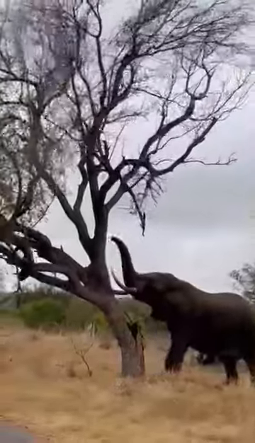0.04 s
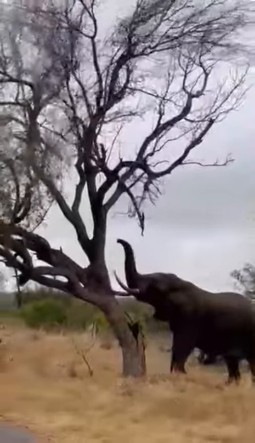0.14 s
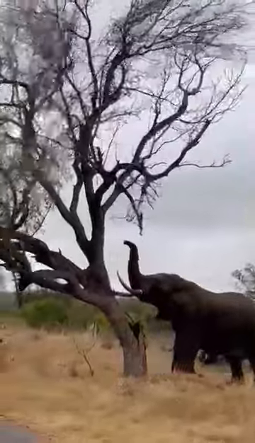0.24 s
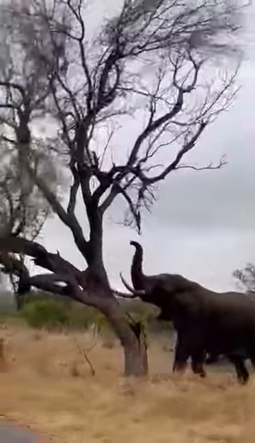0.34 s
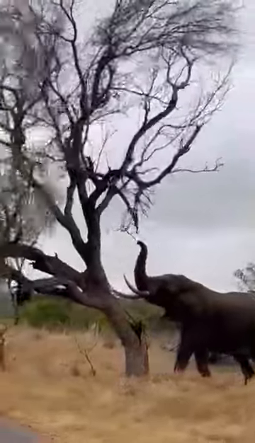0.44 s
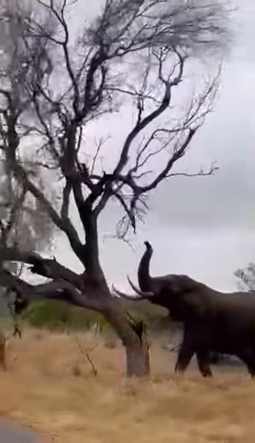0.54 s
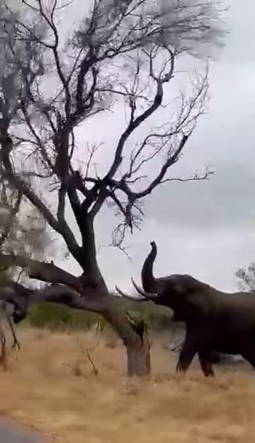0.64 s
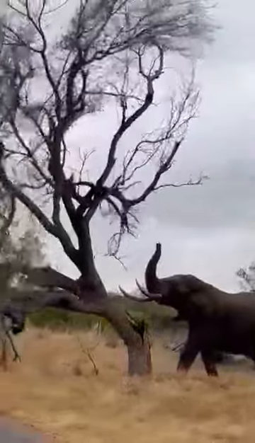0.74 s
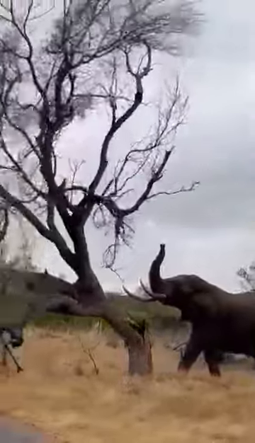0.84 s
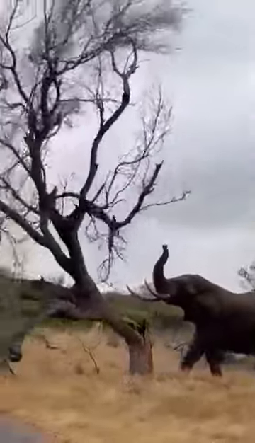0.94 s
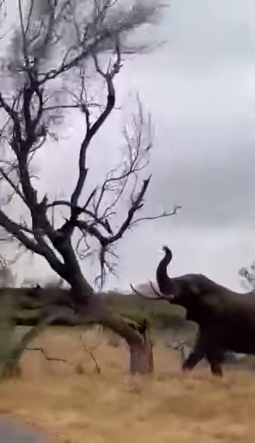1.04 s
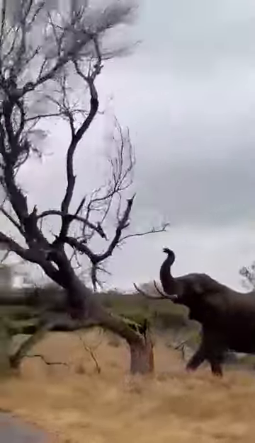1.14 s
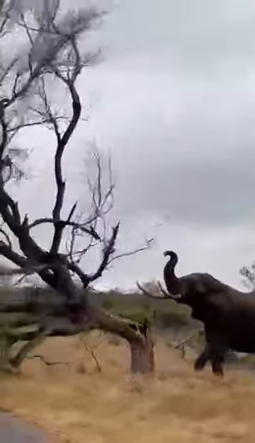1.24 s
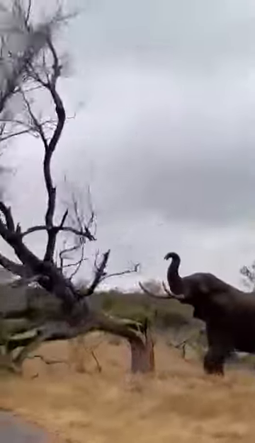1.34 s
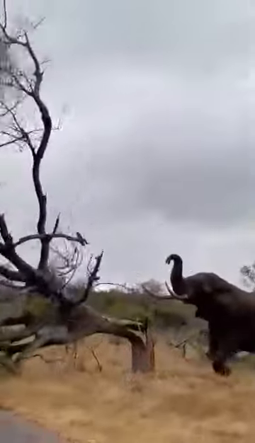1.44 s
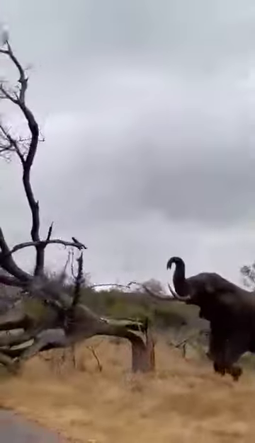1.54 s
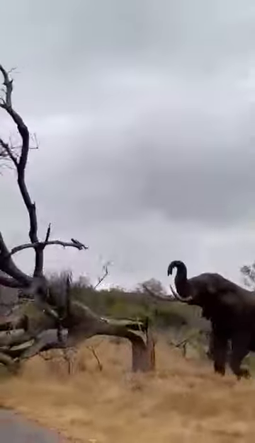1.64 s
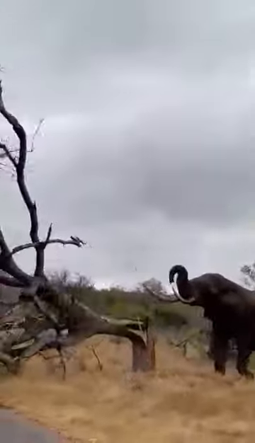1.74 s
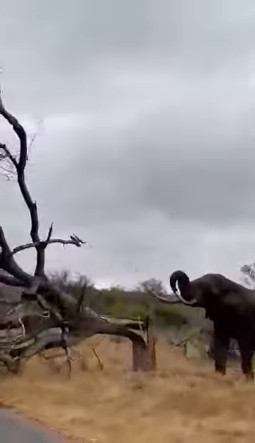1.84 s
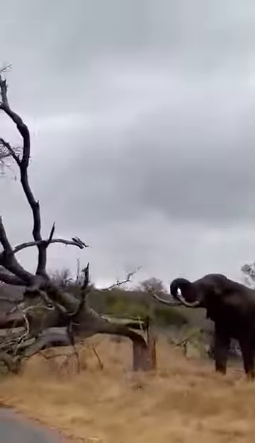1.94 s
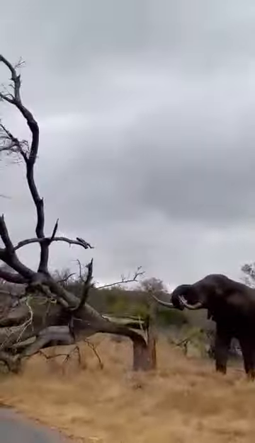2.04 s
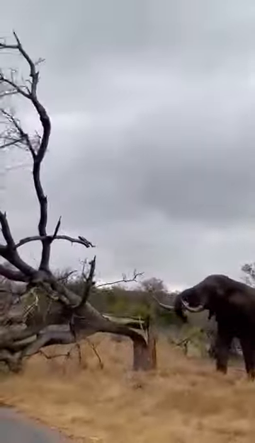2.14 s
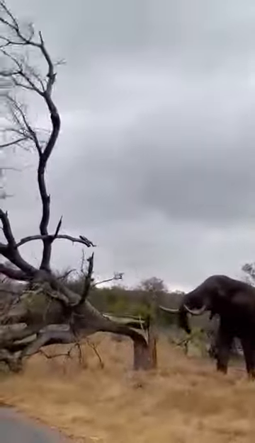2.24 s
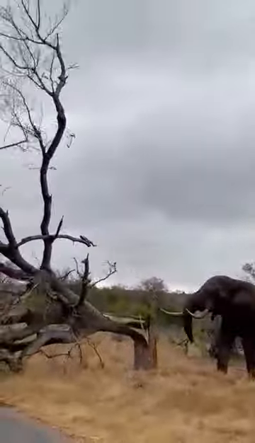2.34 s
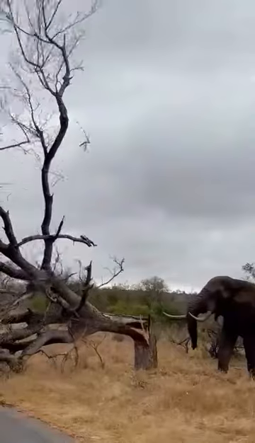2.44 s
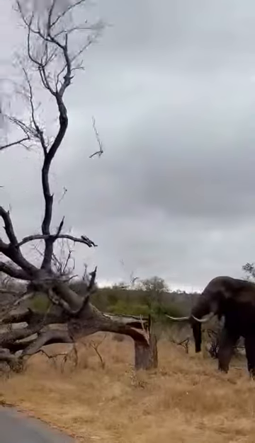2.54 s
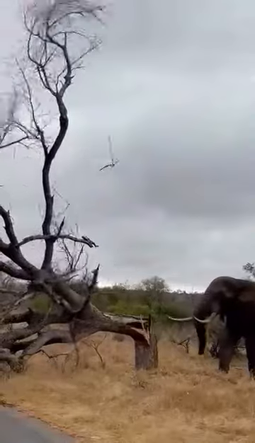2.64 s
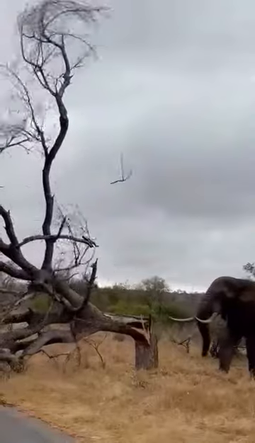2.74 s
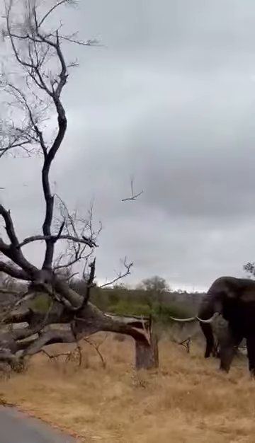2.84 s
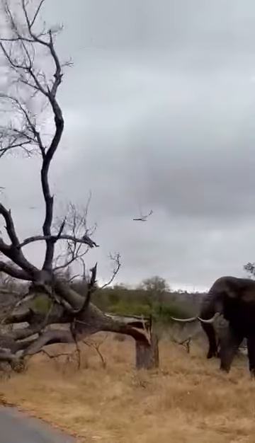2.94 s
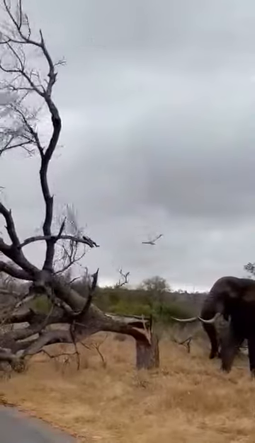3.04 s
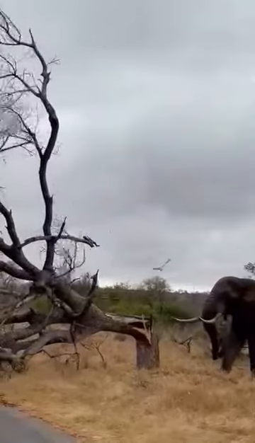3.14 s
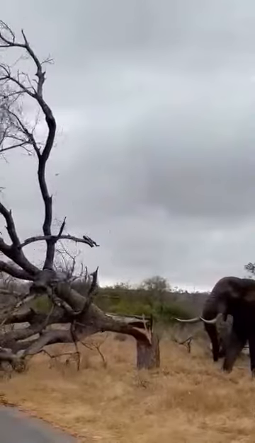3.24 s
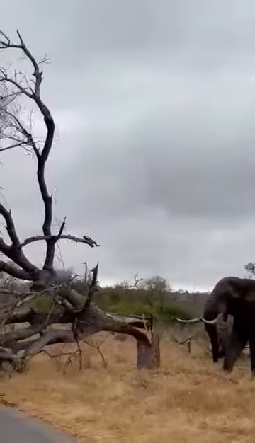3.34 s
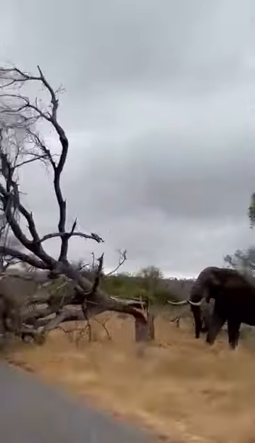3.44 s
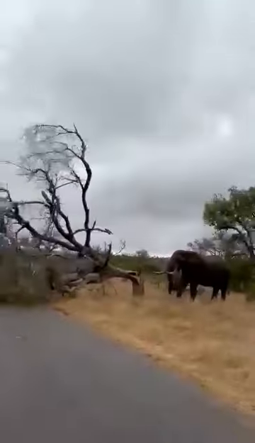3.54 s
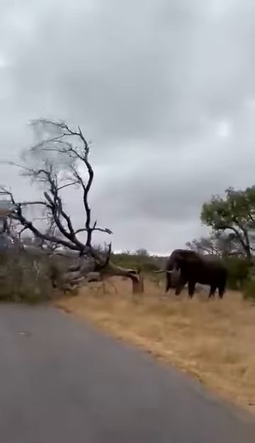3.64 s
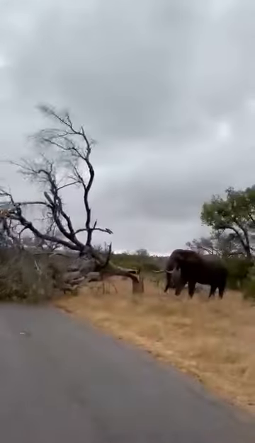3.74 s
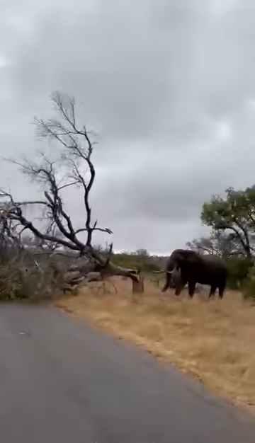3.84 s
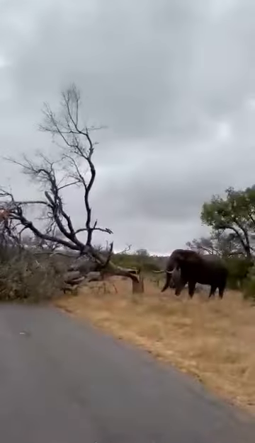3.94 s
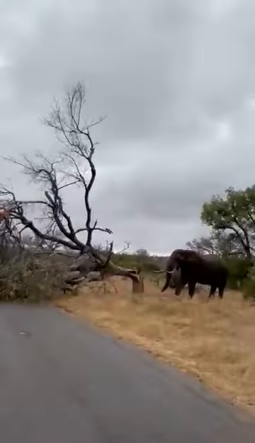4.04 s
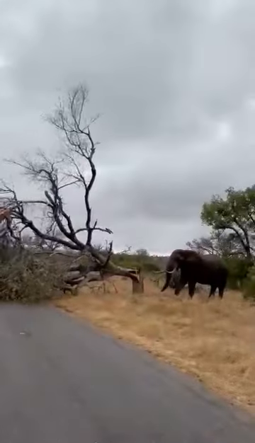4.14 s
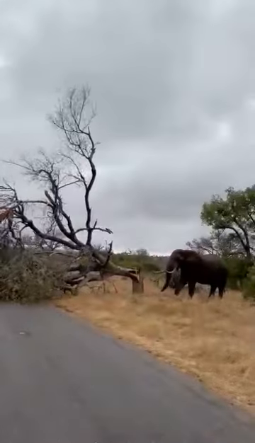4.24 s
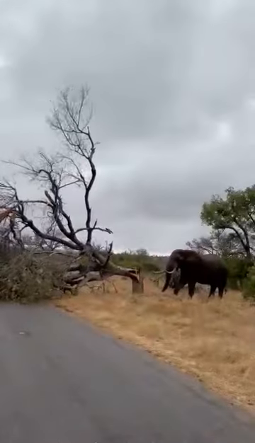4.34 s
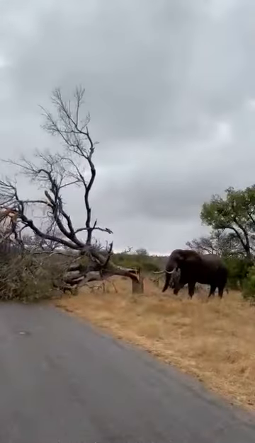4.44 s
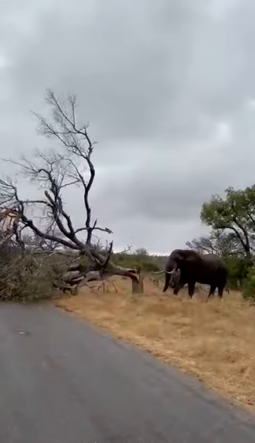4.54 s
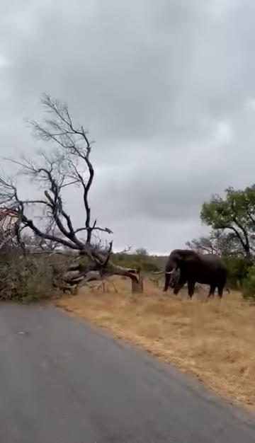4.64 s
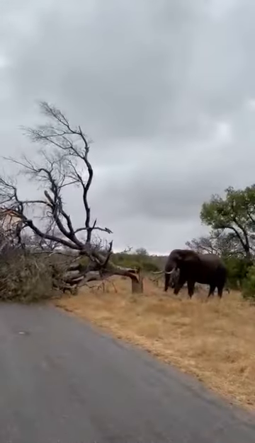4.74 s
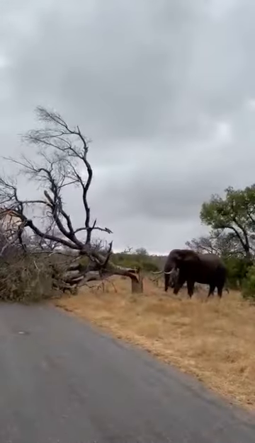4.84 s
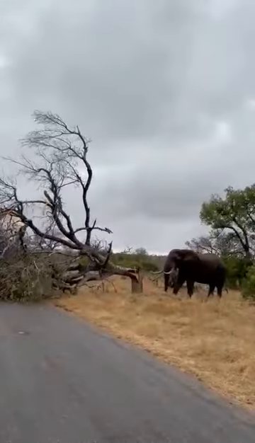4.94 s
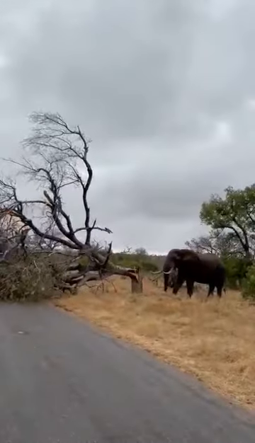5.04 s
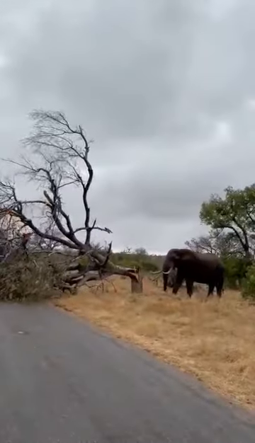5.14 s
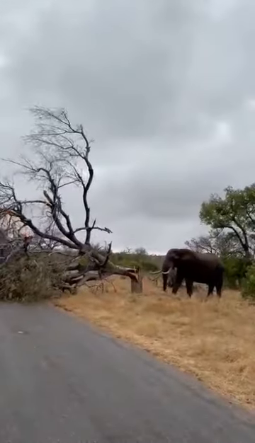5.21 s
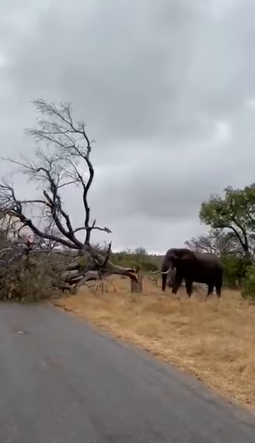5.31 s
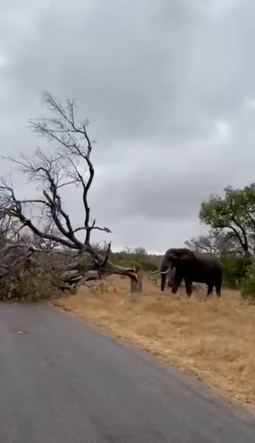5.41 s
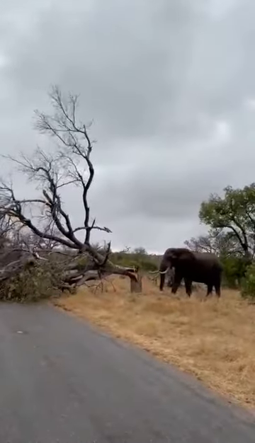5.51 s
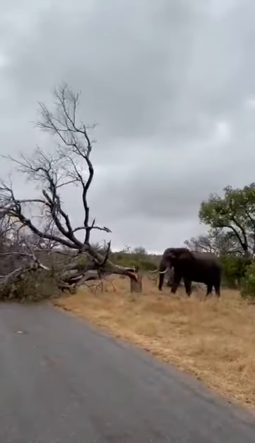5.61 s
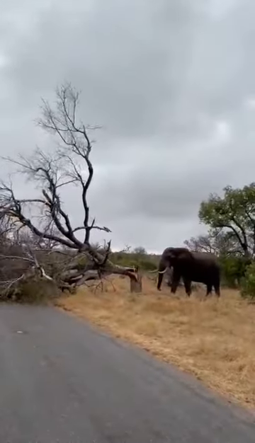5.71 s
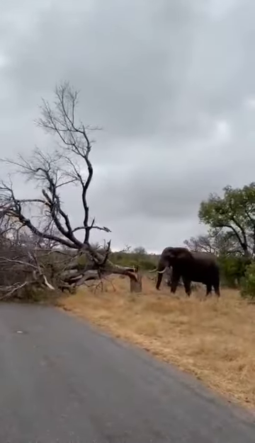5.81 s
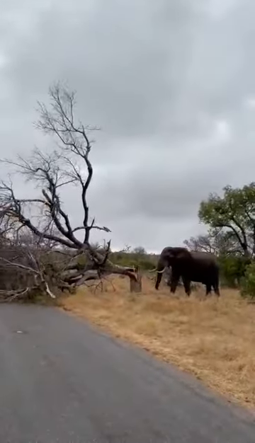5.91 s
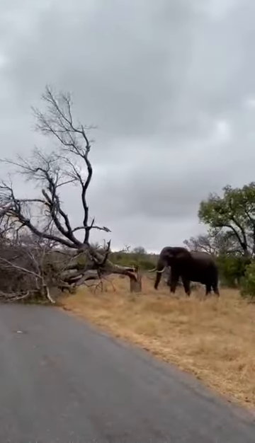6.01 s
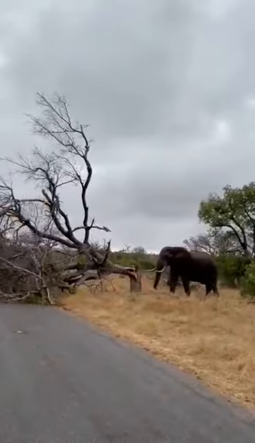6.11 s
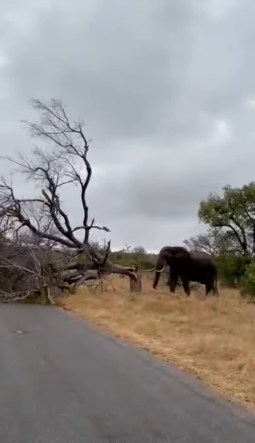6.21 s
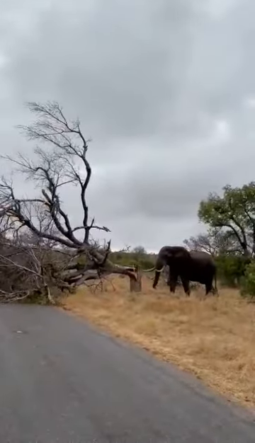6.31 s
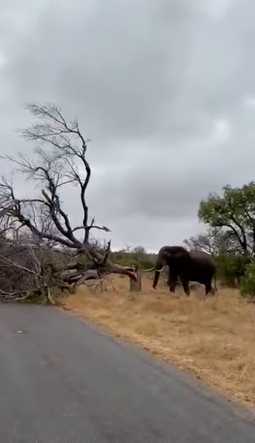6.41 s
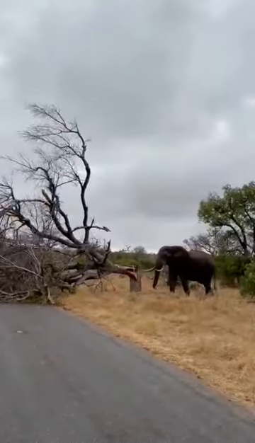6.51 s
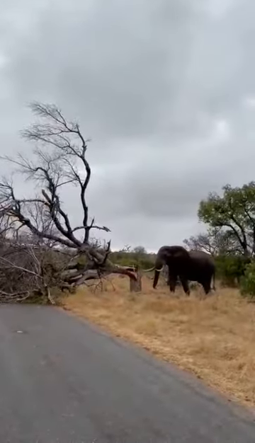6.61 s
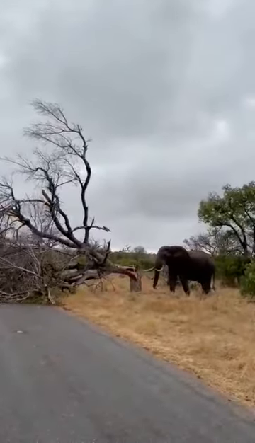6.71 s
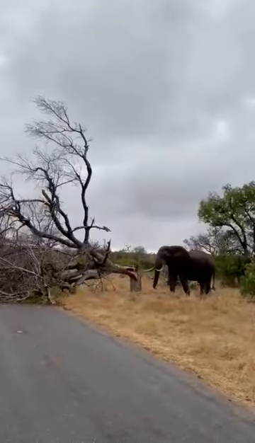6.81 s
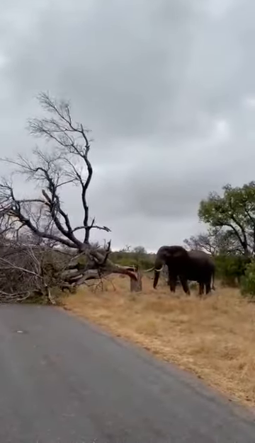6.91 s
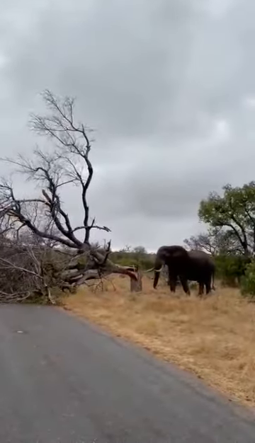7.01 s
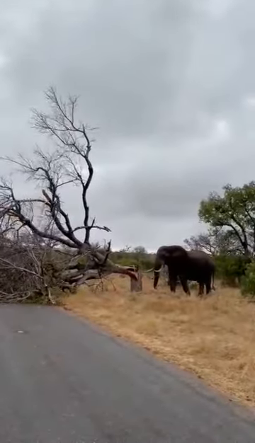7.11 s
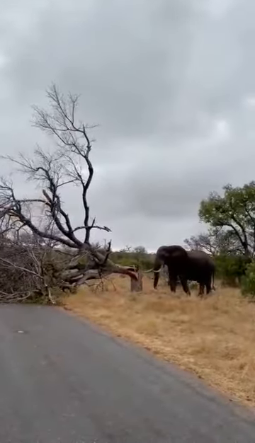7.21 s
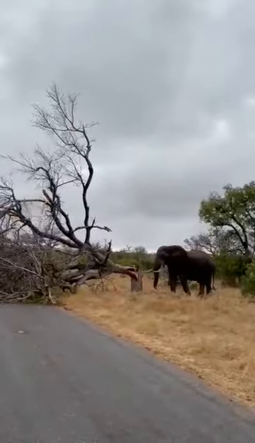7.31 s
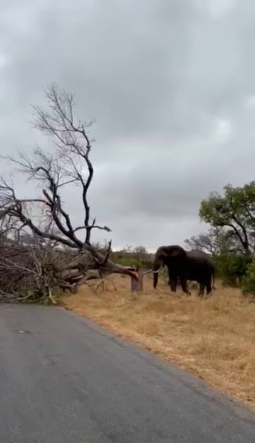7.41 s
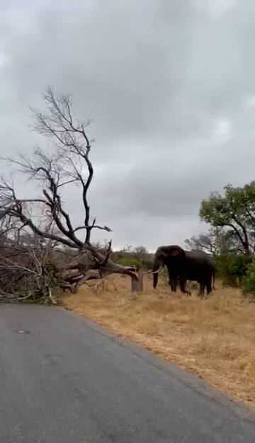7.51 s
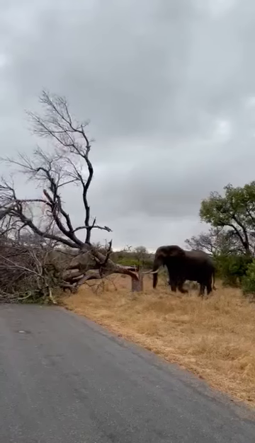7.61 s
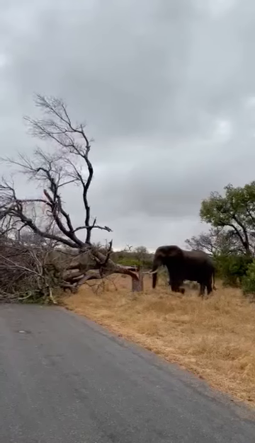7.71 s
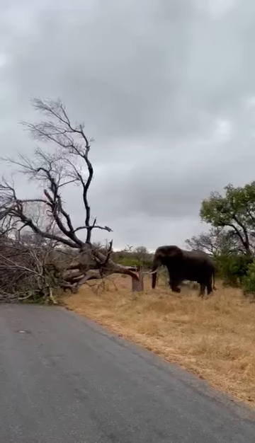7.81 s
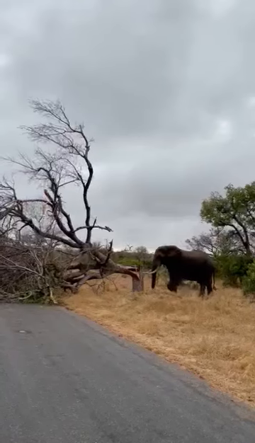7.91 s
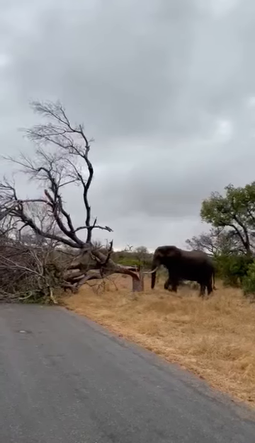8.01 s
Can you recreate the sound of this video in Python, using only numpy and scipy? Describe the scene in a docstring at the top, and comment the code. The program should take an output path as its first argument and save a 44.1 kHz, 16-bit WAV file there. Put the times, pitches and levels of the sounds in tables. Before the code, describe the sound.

Outdoors in open bush, a large dead trunk gives way at once in a dense run of loud, dry cracks. Thick limbs break with thuds sweeping down in pitch, then the crown crashes in crunching crackle and twig hiss. After about three seconds only scattered snaps, soft swishes and ticks remain, fading into a low rumble of air. A slightly overloaded handheld microphone catches a very short, dry echo.

```python
"""A big dead trunk splinters in sharp cracks as the tree is pushed over beside a road in open bush.
Bursts of parting fibres make the cracks; thick limbs break with a thud that sweeps down in pitch.
The crown crashes down in filtered crackle and hiss, then its twigs swish and tick as it settles.
A short outdoor echo, a low rumble of open air and one bump of wind on the microphone surround it."""
import sys
import numpy as np
from scipy import signal
from scipy.fft import rfft, irfft, next_fast_len
from scipy.io import wavfile

SR = 44100
rng = np.random.default_rng(int(sys.argv[2]) if len(sys.argv) > 2 else 0)


def generate_wav(signal):
    """Clip the signal to [-1, 1] and save it as 16-bit WAV at the path in sys.argv[1]."""
    frames = np.transpose(np.atleast_2d(signal))
    scaled = np.clip(frames, -1, 1) * 32767
    pcm = np.round(scaled).astype(np.int16)
    wavfile.write(sys.argv[1], SR, pcm)


N = 355446
TIME = np.arange(N) / SR

# the trunk splits in jerks: (time [s], level [dB])
TRUNK_SPLITS = [(0.006, -10), (0.01, -16), (0.047, -7.5), (0.060, -2), (0.073, -14), (0.081, -18.5),
                (0.137, -18), (0.174, -21.5), (0.253, -14), (0.276, -8.5), (0.292, -17), (0.337, -11),
                (0.344, -17), (0.393, -17.5), (0.405, -12), (0.429, -24.5), (0.471, -19.5), (0.499, -25),
                (0.531, -12.5), (0.551, -12), (0.557, -13), (0.601, -14), (0.622, -14.5), (0.649, -18.5),
                (0.669, -13.5), (0.678, -9.5), (0.706, -15.5), (0.743, -10), (0.782, -8.5), (0.807, -18.5),
                (0.831, -8.5), (0.86, -15.5), (0.874, -15.5), (0.892, -13.5), (0.904, -11.5), (0.914, -13)]
# thick limbs break with a thud:
# (time [s], crack level [dB], crack pitch [Hz], tearing [ms], thud level [dB], thud pitch [Hz])
LIMB_BREAKS = [(0.757, -5, 2030, 3.4, -5.5, 263), (0.924, -0.5, 580, 2.5, -2.5, 172),
               (1.214, -9.5, 1820, 6.1, -21, 74), (1.311, -3.5, 1220, 1.3, -3.5, 340),
               (1.352, -18.5, 879, 50, -19, 420), (1.455, -6, 1700, 5.3, -8, 235),
               (1.600, -4, 1100, 0.93, -6.5, 620), (1.913, -6, 950, 4.6, -5.5, 1170),
               (2.108, -11.5, 1760, 7.5, -23.5, 128), (2.268, -8.5, 1100, 3.5, -27, 171),
               (5.577, -9, 3750, 0.93, -38, 430), (7.84, -47, 1000, 3.5, -34.5, 185)]


def amp(db):
    """Decibels to gain."""
    return 10 ** (np.asarray(db) / 20)


def unit(x):
    """Scale to rms 1."""
    return x / np.sqrt(np.mean(x ** 2))


def band(x, lo_hz, hi_hz, order=2):
    """Causal band-pass."""
    edges = [lo_hz, min(hi_hz, .45 * SR)]
    return signal.sosfilt(signal.butter(order, edges, "band", fs=SR, output="sos"), x)


def across(points, size):
    """Read (Hz, value) points at the bins of a transform, on a log-frequency axis."""
    hz, value = np.transpose(points)
    return np.interp(np.log(np.fft.rfftfreq(size, 1 / SR) + 1), np.log(hz), value)


def colour(x, points):
    """Filter x by a gain curve of (Hz, dB) points."""
    size = next_fast_len(N + 4096)
    return irfft(rfft(x, size) * amp(across(points, size)), size)[..., :N]


def walk(rate):
    """Slow chance with a spread near 1: random values, rate of them a second, joined by lines."""
    knots = rng.standard_normal(2048)
    return np.interp(TIME * rate, np.arange(len(knots)), knots)


def add(track, start_s, sound):
    """Mix a sound into a track."""
    i = max(int(start_s * SR), 0)
    track[i:i + len(sound)] += sound[:N - i]


def fractures():
    """Every crack of trunk, limb and branch as (s, dB, pitch Hz, tearing ms)."""
    # branches snap under the weight of the crown:
    # (time [s], level [dB], pitch [Hz], tearing [ms])
    snaps = [(1.039, -16, 1900, 3), (1.073, -6.5, 3970, 0.53), (1.117, -4.5, 1230, 1.2),
             (1.262, -12, 3580, 2.3), (1.440, -5.5, 1580, 5.7), (1.469, -7.5, 1695, 0.84),
             (1.547, -11.5, 2140, 3.1), (1.567, -6.5, 804, 6), (1.901, -8.5, 2410, 2),
             (1.925, -9.5, 3500, 5.7), (1.936, -6.5, 3760, 2), (2.015, -19, 3480, 10.6),
             (2.258, -13.5, 2510, 3.1), (2.349, -17, 3480, 4.3), (2.447, -20.5, 5440, 7.3),
             (3.277, -27, 2020, 1.8), (3.390, -22.5, 5550, 2), (3.552, -20, 1790, 2),
             (3.615, -21, 1580, 8.8), (3.692, -26.5, 2240, 19), (3.776, -26, 2010, 6),
             (3.813, -21, 2200, 2.6), (3.831, -37, 4000, 1.3), (3.879, -29, 1360, 2.8),
             (3.980, -21, 1710, 10.6), (4.042, -29, 4260, 6.2), (4.516, -21.5, 2980, 4.1),
             (4.582, -29, 3560, 2.7), (4.768, -35.5, 1500, 3.5), (4.790, -35, 5000, 9),
             (5.154, -33.5, 2420, 4), (5.228, -34, 5520, 4.3), (5.261, -30.5, 4360, 27),
             (5.379, -31, 5440, 5), (5.877, -27, 4740, 4.7), (6.123, -19, 2110, 4.1),
             (6.140, -19.5, 4070, 1.7), (6.156, -22.5, 4870, 3), (6.744, -26, 3640, 1.4),
             (6.927, -43.5, 1790, 4), (7.465, -49.5, 1710, 1.9), (7.530, -47, 694, 4.4)]
    split_hz, split_octaves = 2040, .5  # middle pitch of a split, and the full range around it
    shortest_tear_ms, tear_doubling_db = 1.7, 9.5
    pitches = split_hz * 2 ** (split_octaves * (rng.random(len(TRUNK_SPLITS)) - .5))
    trunk = []
    for (start, db), hz in zip(TRUNK_SPLITS, pitches):
        # below -10.5 dB the softer splits tear for longer
        tear_ms = shortest_tear_ms * 2 ** (-min(db + 10.5, 0) / tear_doubling_db)
        trunk.append((start, db, hz, tear_ms))
    return trunk + [row[:4] for row in LIMB_BREAKS] + list(snaps)


def narrowness(start_s, trunk_db=4.5, limb_db=3.0, twig_db=1.26):
    """The trunk breaks first and has a clear pitch; thinner wood snaps over an ever wider range."""
    return np.interp(start_s, [.7, 1.1, 3.5], [trunk_db, limb_db, twig_db])


def branch(pitch_hz, narrow_db, above_db=4.0, low_side=0.21, lowest=0.29, ripple_db=3.3,
           travel_ms=1.494, size=512, count=24):
    """One click through a dry branch: strongest near its pitch, weak far below, with uneven modes."""
    hz = np.fft.rfftfreq(size, 1 / SR) + 1
    octaves = np.log2(hz / pitch_hz)
    db = -above_db * np.maximum(octaves, 0)
    db -= narrow_db * octaves ** 2 * np.where(octaves < 0, low_side, 1)
    db -= 10 * np.log10(1 + (lowest * pitch_hz / hz) ** 4)
    modes_db = np.interp(hz, np.geomspace(300, 12000, count), ripple_db * rng.standard_normal(count))
    # bending waves: low notes leave the wood later than high ones; travel_ms is the delay at 2 kHz
    turns = 2 * travel_ms / 1000 * np.sqrt(2000 * hz)
    return irfft(amp(db + modes_db) * np.exp(-2j * np.pi * turns), size)


def cracks(fibres_per_s=2400, first_break=0.37, gain_db=-3.5, build_ms=1.0, shreds_db=-23,
           shreds_ms=26, size=4096, count=132, channels=4):
    """Fibres start to give, the wood breaks and tearing dies away; each strand rings differently."""
    out, t = np.zeros(N), np.arange(size) / SR
    since_ms = 1000 * (t - t[count])  # the main break comes count samples in
    for start, db, pitch_hz, tear_ms in fractures():
        strain = np.exp(np.minimum(since_ms / build_ms, -since_ms / tear_ms))
        # the last shreds hold on and part after the break
        strain += amp(shreds_db) * np.exp(-since_ms / shreds_ms) * (since_ms > 0)
        strands = rng.standard_normal((channels, size))
        strands *= rng.random((channels, size)) < fibres_per_s / channels / SR
        strands *= strain
        strands[0, count] += 2 * first_break
        snap = np.zeros(size)
        for fibres in strands:
            snap += signal.fftconvolve(fibres, branch(pitch_hz, narrowness(start)))[:size]
        # a longer tear carries more energy at the same level
        length_s = (tear_ms + 1) / 2000
        add(out, start - t[count], amp(db + gain_db) * unit(snap) * np.sqrt(length_s * SR / size))
    return out


def blows():
    """Every thud as (s, dB, pitch Hz): the trunk thumps harder as it comes loose, limbs vary in note."""
    trunk_hz, thump_db = 203, -11  # every split also thumps the trunk, at this level against the split
    held_db, loose_s = -9, 0.28  # weaker while the trunk still holds, until it comes loose
    trunk = []
    for start, db in TRUNK_SPLITS:
        hold_db = np.interp(start, [0, loose_s], [held_db, 0])
        trunk.append((start, db + thump_db + hold_db, trunk_hz))
    return trunk + [(start, db, hz) for start, *_, db, hz in LIMB_BREAKS]


def thuds(turns=1.2, ground=.25, delay_turns=1.29, width=0.78, lowest=0.4, size=4096):
    """High bending waves run faster, so a thud sweeps quickly down towards its ground note."""
    out, t = np.zeros(N), np.arange(1, size + 1) / SR
    for start, db, pitch_hz in blows():
        lateness = np.log(t * pitch_hz / delay_turns)
        # forks and bends disturb the sweep a little, and side branches rattle along with it
        bends = .45 * unit(band(rng.standard_normal(size), pitch_hz / 10, pitch_hz / 2))
        rattle = .17 * unit(band(rng.standard_normal(size), pitch_hz / 2, pitch_hz * 3))
        cycles = turns * lateness + ground * pitch_hz * t + rng.random()
        sweep = np.sin(2 * np.pi * cycles + bends)
        swell = np.exp(-.5 * (lateness / width) ** 2)
        add(out, start, amp(db) * band(swell * (sweep + rattle), lowest * pitch_hz, 5500))
    return out


def squawk(peak_s=1.922, half_s=.021, level_db=-21, width_hz=150, slips_per_s=700):
    """A wrenched limb squawks: wood sticks and slips on wood in an uneven run that rings it."""
    # resonances of the twisting limb: (frequency [Hz], level [dB])
    squawk_modes = [(1100, 2.5), (3162, -11.5), (4975, -9)]
    slips = rng.standard_normal(N) * (rng.random(N) < slips_per_s / SR)
    rub = slips * np.exp(-.5 * ((TIME - peak_s) / half_s) ** 2)
    ring = np.zeros(N)
    for hz, db in squawk_modes:
        ring += amp(db) * unit(band(rub, hz - width_hz / 2, hz + width_hz / 2, order=1))
    return ring * amp(level_db) * np.sqrt(2 * half_s * SR / N)


def motion(t):
    """Levels in dB of boughs, sticks and twigs: each heave builds, lets go and leaves a trickle."""
    # the crown tips, sweeps down, lands, rolls over and rocks to rest:
    # (height of the heave [s], level [dB], build-up [dB/s], release [dB/s], weight on the boughs [dB])
    heaves = [(0.76, -38.5, 21, 45.5, 6.5), (1.27, -28, 26.5, 39, -0.5), (1.5, -23.5, 70, 90, 1.5),
              (1.91, -31, 109.5, 196, -2), (2.181, -33.5, 18.5, 28.5, -7), (3.72, -49, 25, 20, -12.5),
              (5.97, -49, 17.5, 22.5, -6.5), (6.6, -59.5, 31, 55, -7), (7.4, -69, 31.5, 27, 2)]
    trickle_db, bough_trickle_db = -17.5, -5  # loose bits fall after each heave; few of them are heavy
    wood_fade, twig_fade = 7, 8  # how fast the trickle dies away (dB/s)
    twig_smother = 0.14  # dB of twig hiss lost for each dB of weight on the boughs
    boughs = sticks = twigs = 0
    for peak_s, db, build, release, weight_db in heaves:
        before, after = np.maximum(peak_s - t, 0), np.maximum(t - peak_s, 0)
        swell = amp(db - build * before)
        heave = swell * amp(-release * after)
        debris = swell * amp(trickle_db - wood_fade * after)
        chaff = swell * amp(trickle_db - twig_fade * after)
        boughs = boughs + (heave * amp(weight_db)) ** 2 + (debris * amp(bough_trickle_db)) ** 2
        sticks = sticks + heave ** 2 + debris ** 2
        twigs = twigs + (heave * amp(-twig_smother * weight_db)) ** 2 + chaff ** 2
    return 10 * np.log10([boughs, sticks, twigs])


def splinters(stick_hz=2500, bough_hz=700, first_db=1, breaking_db=-8, settled_db=-13, spread_db=4.0,
              busy=.6, narrow_db=1.0, tear_s=0.00083, count=420):
    """Wood snaps at random, more often the more the crown moves; hard in the fall, softly once it lies."""
    out = np.zeros(N)
    s = TIME[::441]
    boughs_db, sticks_db, _ = motion(s)
    broken = np.cumsum(amp(busy * sticks_db))
    strain = np.exp(-TIME[:256] / tear_s)
    for when, strength, thinness in rng.random((count, 3)):
        start = np.interp(when, broken / broken[-1], s)
        size_db = -spread_db * np.log(max(strength, .1))
        db = np.interp(start, s, sticks_db)
        db += np.interp(start, [0, .7, 3], [first_db, breaking_db, settled_db])
        # the harder the boughs are crushed, the thicker the wood that gives
        crush_db = np.interp(start, s, boughs_db)
        pitch_hz = np.interp(crush_db, [-36, -28], [stick_hz, bough_hz]) * 2 ** (thinness - .5)
        fibres = strain * rng.standard_normal(len(strain)) ** 3  # cubing makes a few fibres stand out
        snap = unit(np.convolve(fibres, branch(pitch_hz, narrow_db)))
        add(out, start, snap * amp(db + size_db))
    return out


def crackle(grains_per_s=520, spread_db=3.2, count=13):
    """Countless small snaps and scrapes in pitch bands, of varied size and place; flat on average."""
    out = np.zeros((2, N))
    for hz in np.geomspace(70, 11000, count):
        chance = rng.random((8192, 4)).T
        when, strength, place, sign = chance[:, :int(grains_per_s * N / SR)]
        sizes = amp(-spread_db * np.log(strength.clip(.012))) * np.sign(sign - .5)
        pan = (place - .5) * min(hz / 1200, 1.5)  # high grains spread wider
        clicks = np.zeros((2, N))
        clicks[:, (when * N).astype(int)] = sizes * np.array([1 + pan, 1 - pan])
        out += unit(band(clicks, hz / 1.41, hz * 2.02, order=2)) * np.sqrt(hz)
    return out


def crown(swish_db=-5, surge_db=1.0, hiss_db=-7):
    """Boughs rumble, sticks crackle and twigs swish, surging less once the crown lies."""
    # tone of the moving crown before its zones are levelled: (frequency [Hz], level [dB])
    crown_colour = [(50, -13.5), (120, -6.5), (350, -9), (800, -2.5), (1300, -2), (3000, -9.5), (6000, -18),
                    (9000, -31), (12000, -24)]
    # the high swish comes from twigs spread wide to both sides
    sides = band(rng.standard_normal((2, N)), 2200, 9900, order=1)
    swish = unit(rng.standard_normal(N) + 0.084 * sides)
    texture = colour(unit(crackle()) + amp(swish_db) * swish, crown_colour)
    zones = [(50, 452), (443, 3380), (2800, SR)]  # boughs, sticks, twigs (Hz)
    gains = amp(motion(TIME))
    out = np.zeros((2, N))
    for (lo, hi), gain in zip(zones, gains):
        out += unit(band(texture, lo, hi, order=3)) * gain
    # after the fall a faint, narrow hiss near 9 kHz follows the twigs
    lying = np.interp(TIME, [1.8, 3.2], [0, 1])
    out += unit(band(swish, 8700, 9000)) * gains[-1] * lying * amp(hiss_db)
    return out * amp(surge_db * (2.0 - lying) * walk(45))


def twig_ticks(pitch_hz=2050, octaves=1.2, follow=0.73, ticks_db=-13, count=440, size=1024):
    """Thin twigs flick past each other: short, dry, pitched ticks that follow the crown's rocking."""
    out, t = np.zeros(N), np.arange(size) / SR
    cycles, spread_db = 3.2, 3.8  # a tick dies away over a few cycles
    for when, strength, thinness in rng.random((count, 3)):
        start = np.interp(when, [0, .3, 1], [2.4, 5.7, 7.6])  # most come late
        hz = pitch_hz * 2 ** (octaves * (thinness - .5))
        db = follow * motion(start)[1] + ticks_db - spread_db * np.log(max(strength, .03))
        add(out, start, amp(db) * np.sin(2 * np.pi * hz * t) * np.exp(-hz * t / cycles))
    return out


def bush(x, near_db=-10.5, near_t60=0.085, far_db=-23, far_t60=0.21, apart=0.19, size=44100):
    """Outdoor echo: quick scatter from ground and crown, then a faint tail from the bushes around."""
    t = np.arange(size) / SR
    noise = rng.standard_normal(size) + apart * rng.standard_normal((2, size))
    near = band(noise, 250, 17000, order=1) * amp(-60 * t / near_t60) * (t > .002)
    far = band(noise, 170, 6700, order=1) * amp(-60 * t / far_t60) * (1 - np.exp(-t / 0.016))
    echo = (amp(near_db) * unit(near) + amp(far_db) * unit(far)) / np.sqrt(size)
    return signal.fftconvolve(x[None], echo, axes=1)[:, :N]


def air(level_db=-61):
    """A low outdoor rumble that wavers slightly, nearly the same on both sides."""
    # tone of the open air, relative: (frequency [Hz], level [dB])
    air_colour = [(25, -4), (70, 0.5), (170, -4.5), (290, -7), (480, -25.5), (1200, -21), (3500, -38.5),
                  (11000, -52)]
    noise = rng.standard_normal(N) + 0.16 * rng.standard_normal((2, N))
    return unit(colour(noise, air_colour)) * amp(level_db + walk(3))


def gusts(lo_hz=30, hi_hz=75, peak_s=4.74, half_s=.045, level_db=-52):
    """Wind nudges the microphone once: a soft, low bump of noise."""
    push = amp(level_db) * np.exp(-.5 * ((TIME - peak_s) / half_s) ** 2)
    return push * unit(band(rng.standard_normal(N), lo_hz, hi_hz))


def scene():
    """Fractures, thuds and ticks with their echo, over the crashing crown and the open air."""
    wood = cracks() + splinters() + thuds() + squawk() + twig_ticks()
    return wood + bush(wood) + crown() + air() + gusts()


def record(dry, top_hz=11600):
    """Two microphone ports differ in level and phase; treble is shaped, peaks rounded, the top cut."""
    # tone of the microphone: (frequency [Hz], level [dB])
    mic_colour = [(5000, -0.5), (7000, 4.5), (9000, 1), (11500, -2.5)]
    # level between the ports: (frequency [Hz], left minus right [dB])
    port_balance = [(110, 0), (550, 3.6), (1150, 0)]
    # phase between the ports: (frequency [Hz], lead of the left [rad])
    port_phase = [(250, 0), (650, -.5), (1200, 0), (2700, .3), (3700, -.1), (5200, .1), (7700, 2.7),
                  (9450, 3.2), (9750, 2 * np.pi)]
    size = next_fast_len(N + 4096)
    lean = amp(across(port_balance, size) / 2)
    lag = np.exp(-1j * across(port_phase, size))
    spectrum = rfft(colour(dry, mic_colour), size)
    ports = irfft(spectrum * np.array([lean, lag / lean]), size)[:, :N]
    rounded = ports / (1 + ports ** 4) ** (1 / 4)
    return signal.sosfilt(signal.ellip(8, .2, 70, top_hz, fs=SR, output="sos"), rounded)


dry = scene()
out = record(dry)
generate_wav(out)
```